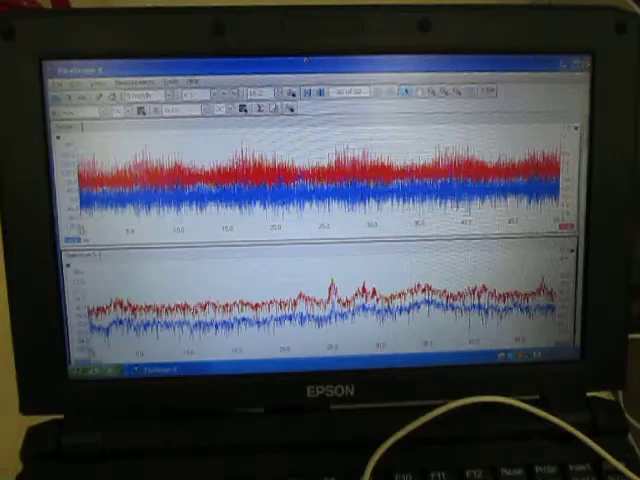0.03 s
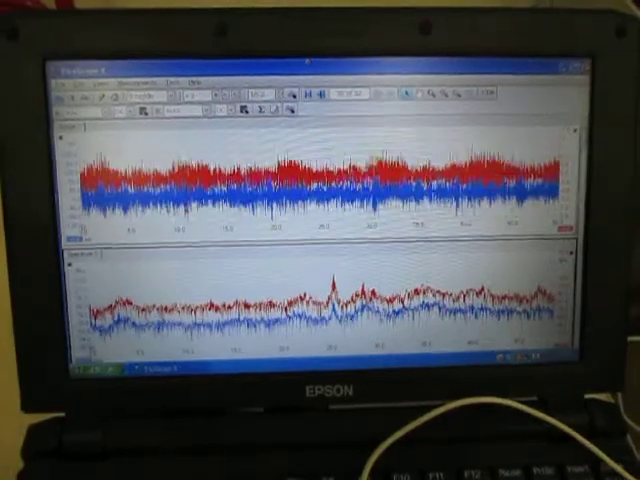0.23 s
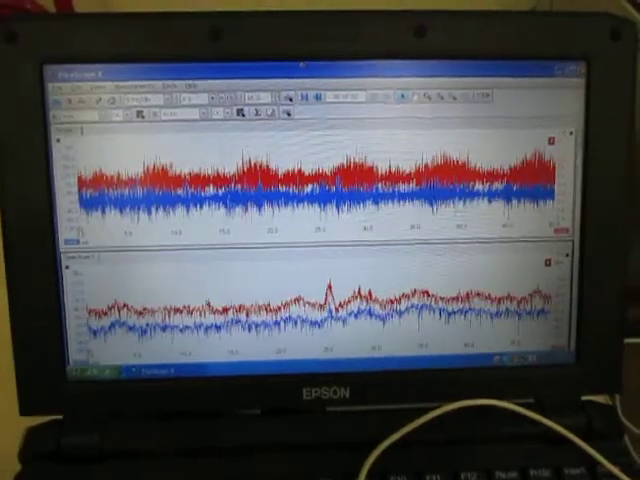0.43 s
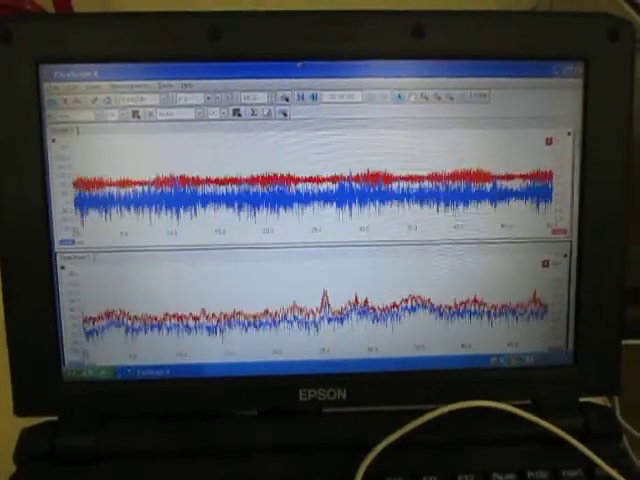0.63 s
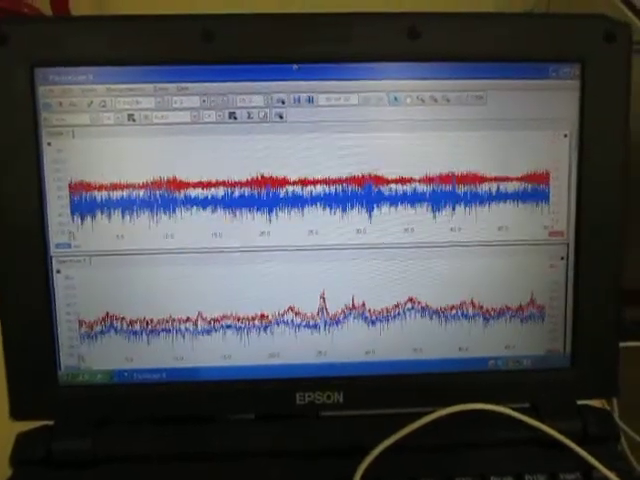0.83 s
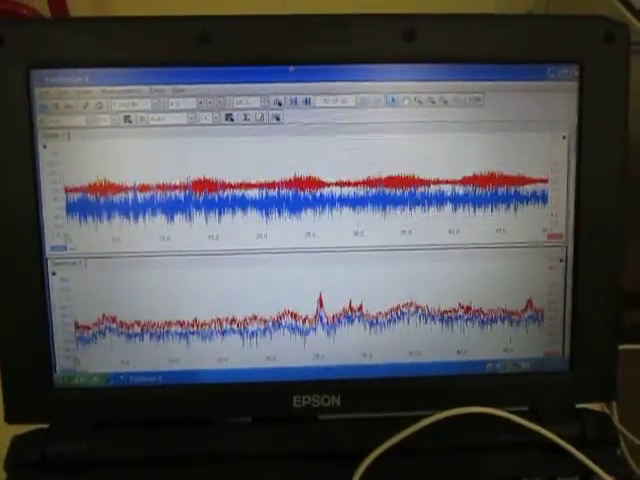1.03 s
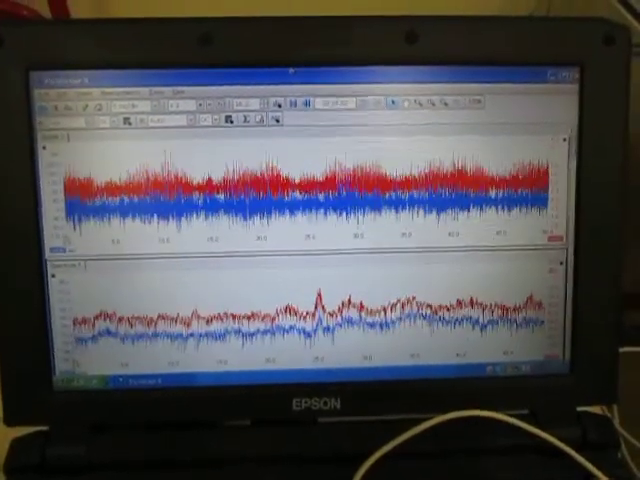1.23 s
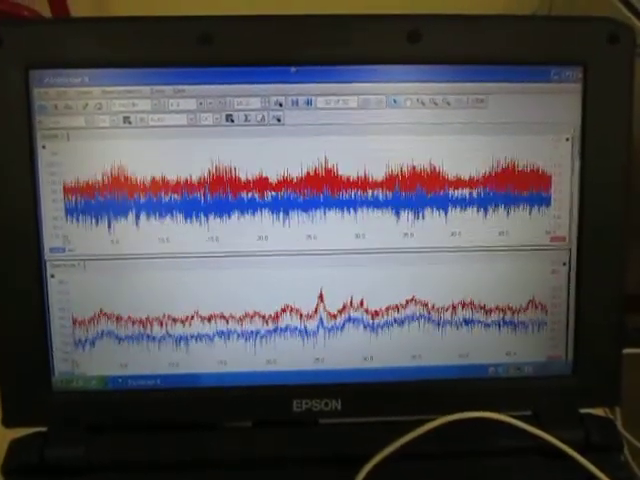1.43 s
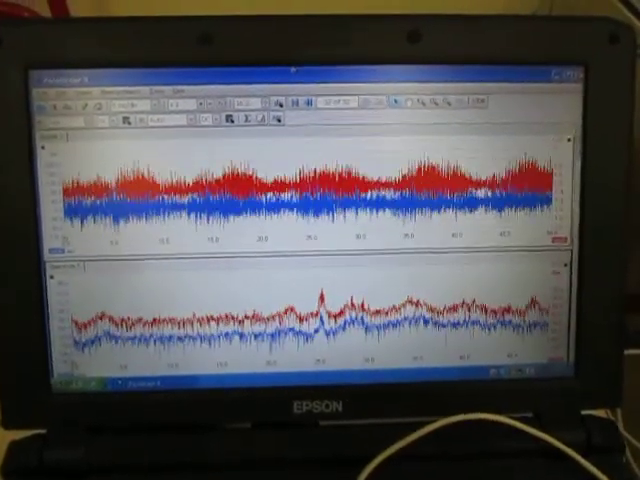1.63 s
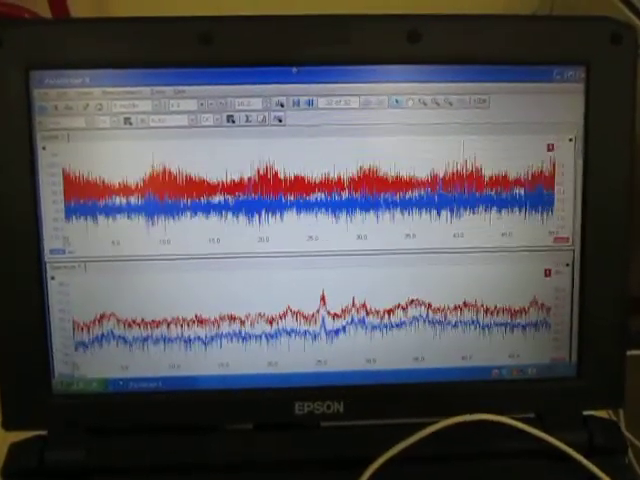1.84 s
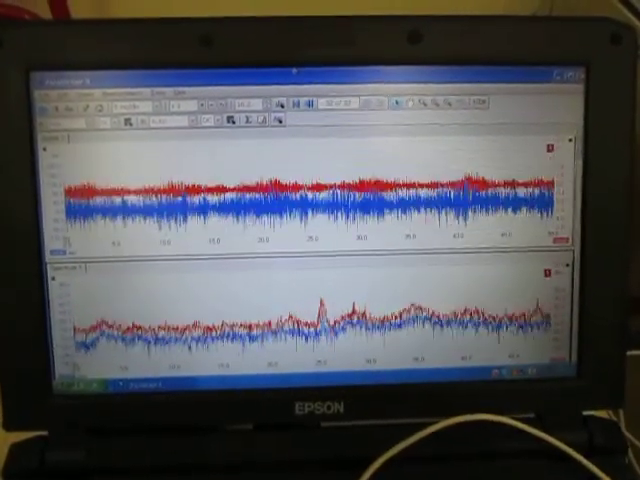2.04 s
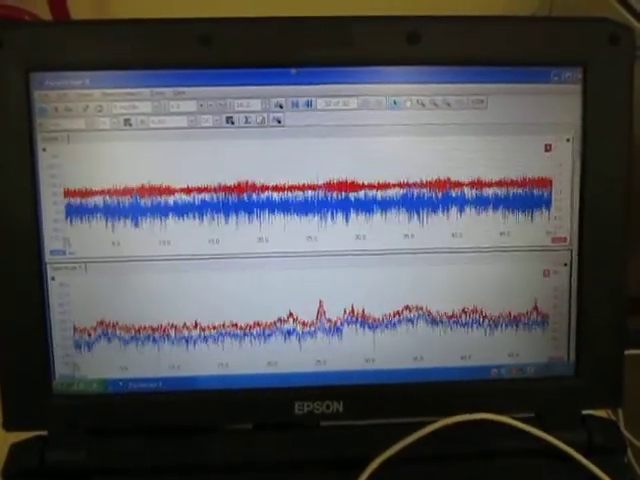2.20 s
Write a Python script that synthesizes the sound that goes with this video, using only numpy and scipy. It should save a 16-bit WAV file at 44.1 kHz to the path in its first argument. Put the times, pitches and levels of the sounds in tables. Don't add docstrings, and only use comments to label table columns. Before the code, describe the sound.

An ultrasonic cleaning tank runs in a laboratory, picked up in mono by a small camera. Silence until 0.25 s, then abruptly a coarse electrical buzz around 100 Hz, a gritty whine near 6-7 kHz and fizzing bubble hiss, all fluttering about nine times a second. The hum dips around 0.7-1.1 s, swells near 1.5-1.9 s, then sags towards 2.27 s. A soft pump rumble continues underneath.

```python
import sys
import numpy as np
from scipy import signal
from scipy.fft import rfft, irfft, next_fast_len
from scipy.io import wavfile
from scipy.ndimage import uniform_filter1d, map_coordinates

SR = 44100
rng = np.random.default_rng(int(sys.argv[2]) if len(sys.argv) > 2 else 0)


def amplitude_ratio(level_db):
    exponent = np.asarray(level_db, float) / 20
    return 10 ** exponent


def output_pcm(signal):
    pcm = np.clip(np.atleast_2d(signal).T, -1, 1) * 32767
    wavfile.write(sys.argv[1], SR, np.round(pcm).astype(np.int16))


N = 100018

MAINS_HZ, SWEEP_HZ = 100.05, 90.6
MAINS_RAD, SWEEP_RAD, BEAT_RAD = -1.2, 2.1, -1.5


def unit(x):
    return x / np.sqrt(np.mean(x ** 2) + 1e-20)


def clock():
    return np.arange(N) / SR


def curve(rows):
    return np.interp(clock(), *np.transpose(rows)[[0, -1]])


def swing(level_db):
    return level_db - level_db.mean()


def wobble(rate):
    coarse = clock()[::64]
    knots = rng.standard_normal(200)
    return np.interp(clock(), coarse, map_coordinates(knots, [coarse * rate]))


def filtered(x, response):
    m = next_fast_len(N + 8192)
    return irfft(rfft(x, m) * response(np.fft.rfftfreq(m, 1 / SR)), m)[:N]


def colour(points):
    f, v = np.transpose(points)
    return lambda hz: amplitude_ratio(np.interp(np.log(hz + 1), np.log(f), v, left=-120, right=-120))


def resonance(hz, centre, width):
    return 1 / (1 + (2 * (hz - centre) / width) ** 2)


def patchy(patchy_db):
    z = signal.stft(rng.standard_normal(N + 512), nperseg=512)[2]
    patches = uniform_filter1d(rng.standard_normal(z.shape), 6, axis=0)
    patches = uniform_filter1d(patches, 8, axis=1)
    return signal.istft(z * amplitude_ratio(patchy_db * unit(patches)), nperseg=512)[1][:N]


def phases():
    turn = 2 * np.pi * clock()
    mains = turn * MAINS_HZ + MAINS_RAD
    sweep = turn * SWEEP_HZ + SWEEP_RAD
    return mains, sweep, turn * (MAINS_HZ - SWEEP_HZ) + BEAT_RAD


# (time [s], level [dB])
FIELD = [(.25, -26.5), (.5, -23.5), (.7, -32.5), (.82, -31), (.98, -29), (1.12, -32.5), (1.35, -26),
         (1.63, -22.5), (1.9, -23), (2.12, -28.5), (2.27, -27)]
# (time [s], level [dB])
SWEEP_STRENGTH = [
    (.25, 2),
    (.45, 1),
    (.75, 8.5),
    (1.1, -2.9),
    (1.35, 0.5),
    (1.6, -3.5),
    (1.95, -6.5),
    (2.15, -2),
    (2.27, 4),
]
SWEEP_SHARE = [0.27, 0.93, 0.74, 1]
HUM_ORDERS = [(1, 0), (0, 1), (-1, 2), (2, 0), (1, 1), (0, 2), (3, 0), (2, 1), (1, 2), (0, 3), (4, 0),
              (3, 1), (2, 2), (1, 3)]
# (level over the ripple line [dB], how far it follows the field [dB per dB])
HUM_LEVELS = [(1.5, 1.3), (-8, 0.11), (-13, 2.4), (-1, 0.78), (-6.5, -0.19), (-2.5, 1.1), (-8, -1.5),
              (-11.5, 2.7), (-2.5, .7), (-14, -0.76), (-14, 0.75), (-10.5, 0.92), (-14, -0.1), (-9, 1.1)]
# (time [s], lag per mains order [rad], lag per sweep order [rad], common lag [rad])
PHASE_LAG = [
    (.7, .6, .4, 4),
    (1.15, -.2, -.1, 1.7),
]
# (frequency [Hz], width [Hz], level [dB])
PANEL = [(564, 155, 2.5), (1440, 58, 15)]


def hum():
    mains, sweep, _ = phases()
    s, *lags = np.transpose(PHASE_LAG)
    mains_lag, sweep_lag, lag = [np.interp(clock(), s, v) for v in lags]
    mains, sweep = mains + mains_lag, sweep + sweep_lag
    field_db, sweep_db = curve(FIELD), curve(SWEEP_STRENGTH)

    lower, upper = np.zeros(N), np.zeros(N)
    for (m, n), (db, follows) in zip(HUM_ORDERS, HUM_LEVELS):
        level_db = db + follows * swing(field_db) + SWEEP_SHARE[abs(n)] * sweep_db
        level_db = level_db + 2 * wobble(3.17)
        lower += amplitude_ratio(level_db) * np.cos(m * mains + n * sweep + lag + 0.65 * wobble(8))

    for order in range(5, 18):
        for n in range(5):
            level_db = -18.5 - 1.7169 * (order - 5) - 2.3 * n + 3.5 * wobble(5.065)
            upper += amplitude_ratio(level_db) * np.cos((order - n) * mains + n * sweep + lag + 1.1 * wobble(4))

    panel = lambda f: 1 + sum((amplitude_ratio(db) - 1) * resonance(f, c, w) for c, w, db in PANEL)
    upper = filtered(upper * amplitude_ratio(0.44 * swing(field_db)), panel)
    return np.sqrt(2) * amplitude_ratio(field_db.mean()) * (lower + upper)


# (time [s], level [dB])
BUBBLING = [(0.26, -26.5), (0.516, -31), (0.554, -31.5), (0.622, -33.5), (0.644, -28.5), (0.828, -32),
            (1.106, -30.5), (1.48, -30.5), (1.506, -28), (1.636, -29.5), (1.718, -28), (1.802, -33),
            (2.13, -29), (2.142, -28), (2.214, -31.5), (2.26, -30.5)]
# (frequency [Hz], level per Hz [dB])
HISS_COLOUR = [(2500, -77), (3600, -22.5), (5000, -4), (6500, 2.5), (8300, -1), (11500, 0.5), (13700, -4),
               (15700, -11.5)]
# (frequency [Hz], width [Hz], level [dB])
TANK_WALL = [(12520, 390, -2), (12680, 680, -1.5), (11970, 600, -11)]


def cavitation():
    mains, sweep, beat = phases()
    strength_db = curve(BUBBLING)
    hiss = unit(filtered(patchy(patchy_db=0.5), colour(HISS_COLOUR))) * (1 + 0.18 * np.cos(beat))

    wall = lambda f: np.sqrt(sum(amplitude_ratio(2 * db) * resonance(f, c, w) ** 2 for c, w, db in TANK_WALL))
    ring = unit(filtered(patchy(patchy_db=1.5), wall))
    wander_hz = 35 * wobble(12)
    wander = np.exp(2j * np.pi * np.cumsum(wander_hz) / SR)
    chop = (1 + 0.052 * (np.cos(mains) + np.cos(sweep))) * (1 + 0.071 * np.cos(beat - .7))
    sing = np.real(signal.hilbert(ring) * wander) * chop
    sing_db = -21.5 + 0.82 * swing(strength_db) + 0.27 * wobble(12.44)
    return amplitude_ratio(strength_db + 4) * hiss + amplitude_ratio(sing_db) * sing


WHINE_HZ = [6834.2, 6279.4, 7197.5]
WHINE_SHARE_DB = [6, 1.5, -3]
# (frequency [Hz], level per Hz [dB])
WHINE_COLOUR = [(4300, -33), (5000, -10), (5800, -4.5), (6500, 1), (7400, -3), (7800, -2.5), (7950, -40)]
# (time [s], level [dB])
STANDING_WAVE = [
    (0.26, -25.5),
    (0.8, -31.5),
    (1.53, -24),
    (1.752, -30.5),
    (2.182, -32.5),
    (2.204, -27),
    (2.26, -28.5),
]


def whine():
    mains, sweep, beat = phases()
    orders, cycle = np.arange(-30, 20), np.linspace(0, 2 * np.pi, 2049)
    tone = 0
    for hz, db in zip(WHINE_HZ, WHINE_SHARE_DB):
        draw = rng.random((50, 2))
        sidebands = np.exp(1j * (orders[:, None] * cycle + 2 * np.pi * draw[:, 1:]))
        pattern = (draw[:, :1] * sidebands).sum(axis=0)
        drive = 2 * np.pi * hz * clock() + 0.9 * np.sin(sweep) + 0.7 * wobble(8.96)
        voice = np.real(np.interp(mains % (2 * np.pi), cycle, pattern) * np.exp(1j * drive))
        tone = tone + amplitude_ratio(db + 3.1 * wobble(3.06)) * voice

    haze = 0.65 * unit(patchy(patchy_db=2))
    band = unit(filtered(unit(tone) + haze, colour(WHINE_COLOUR)))
    low_edge = filtered(band, lambda f: 1 / (1 + (f / 5700) ** 16))
    throb = np.cos(beat) * (0.14 * band + 0.7 * low_edge)
    return amplitude_ratio(-29.5 + 0.43 * swing(curve(STANDING_WAVE))) * (band + throb)


# (frequency [Hz], level per Hz [dB])
RUMBLE_COLOUR = [(20, -30), (35, -2), (140, -7), (250, -4.5), (550, -15), (1200, -20.5), (3300, -27.5),
                 (5000, -30.5)]


def pump():
    mains, _, beat = phases()
    flow = patchy(patchy_db=-0.5) * (1 + 0.1 * np.cos(mains)) * (1 + 0.071 * np.cos(beat))
    rumble = unit(filtered(flow, colour(RUMBLE_COLOUR)))
    swell_db = 0.05 * swing(curve(FIELD)) + 0.71 * swing(curve(BUBBLING))
    shaft = unit(filtered(rng.standard_normal(N), lambda f: resonance(f, 48.5, 8)))
    return amplitude_ratio(-26 + swell_db) * rumble + amplitude_ratio(-39) * shaft


def scene():
    return (hum() + cavitation() + whine() + pump())[None]


def roll_off(x):
    return signal.sosfilt(signal.butter(12, 15820, fs=SR, output="sos"), x)


def record(dry):
    notch_hz, notch_width_hz, top_hz = 7850, 230, 15750
    open_s, open_rise_s = .2432, .003

    def camera(f):
        damping = 1j * f * notch_width_hz
        return (f < top_hz) * (1 - damping / (notch_hz ** 2 - f * f + damping))

    opening = np.clip((clock() - open_s) / open_rise_s, 0, 1)
    mix = filtered(dry[0], camera) * opening
    return roll_off(mix[None])


dry = scene()
out = record(dry)
output_pcm(out)
```